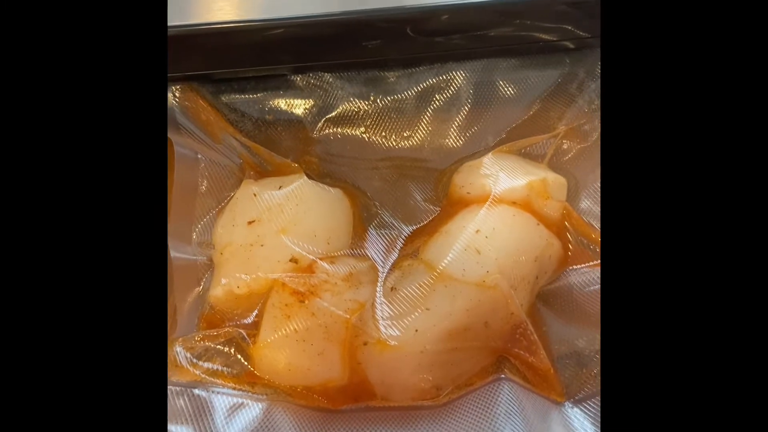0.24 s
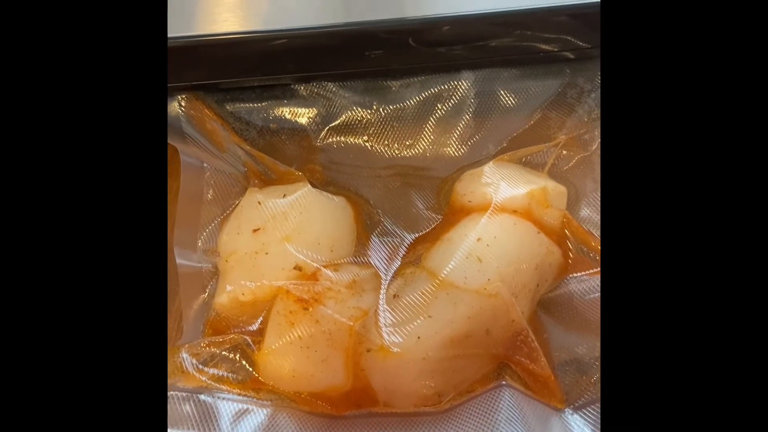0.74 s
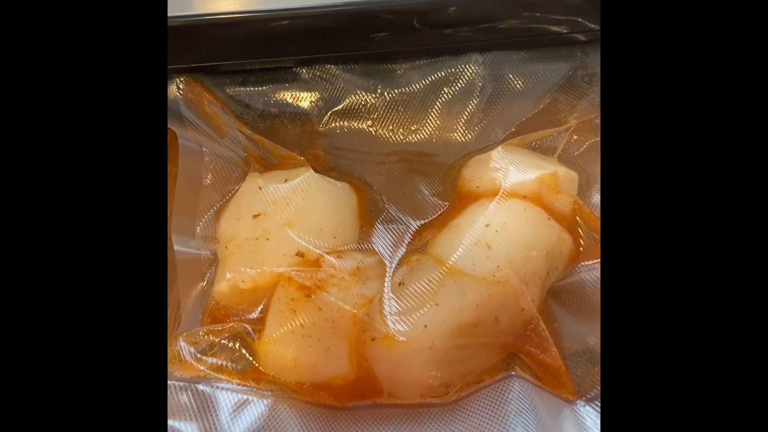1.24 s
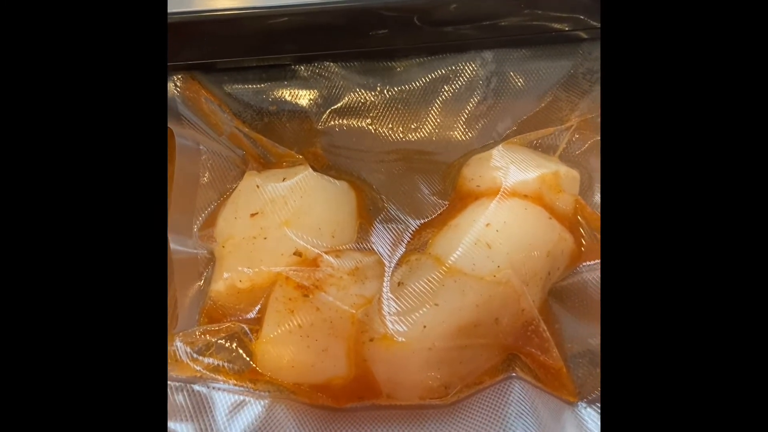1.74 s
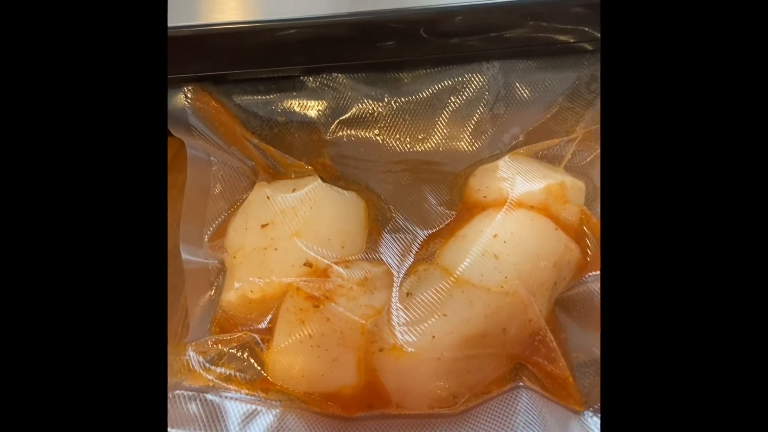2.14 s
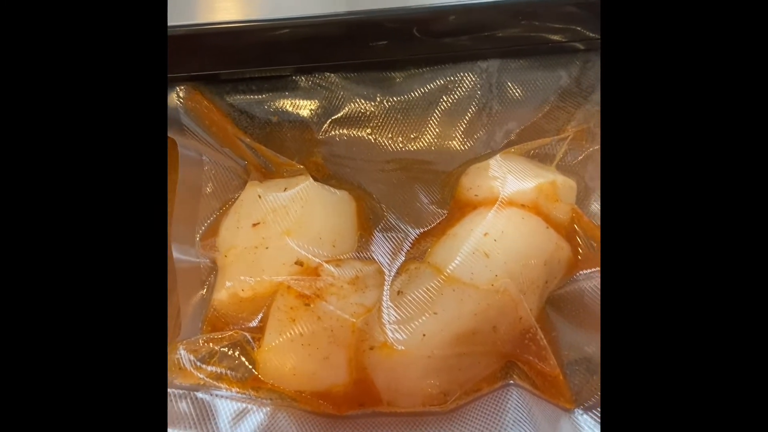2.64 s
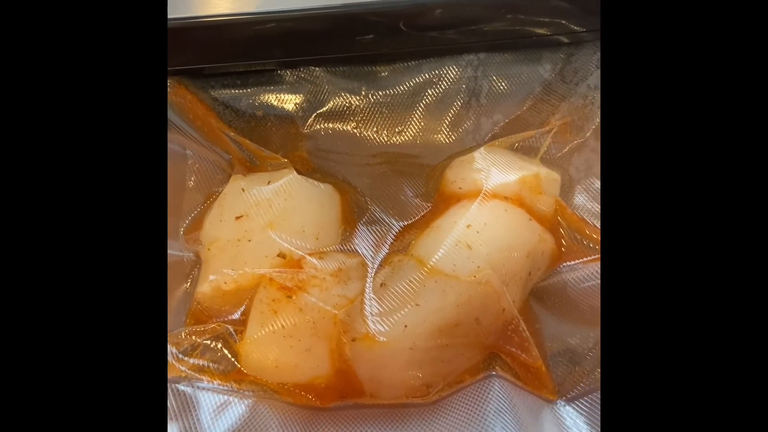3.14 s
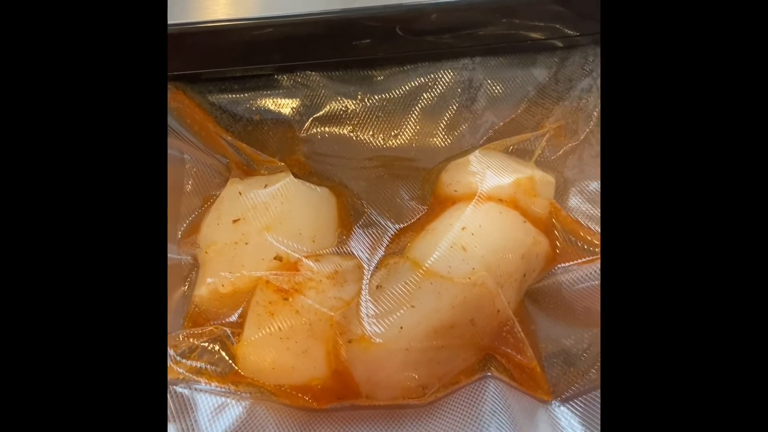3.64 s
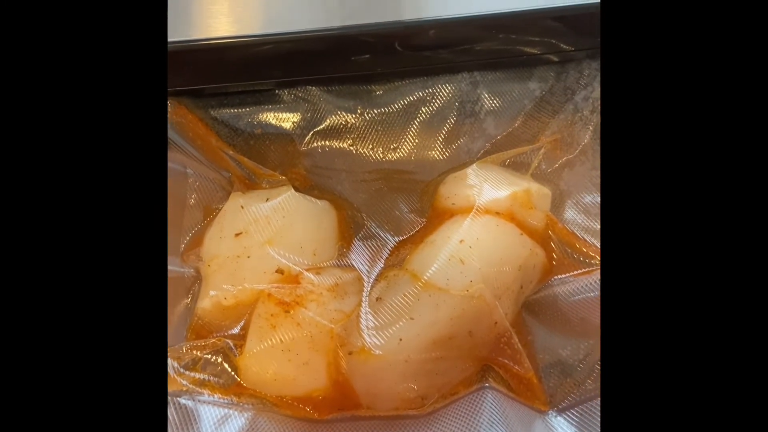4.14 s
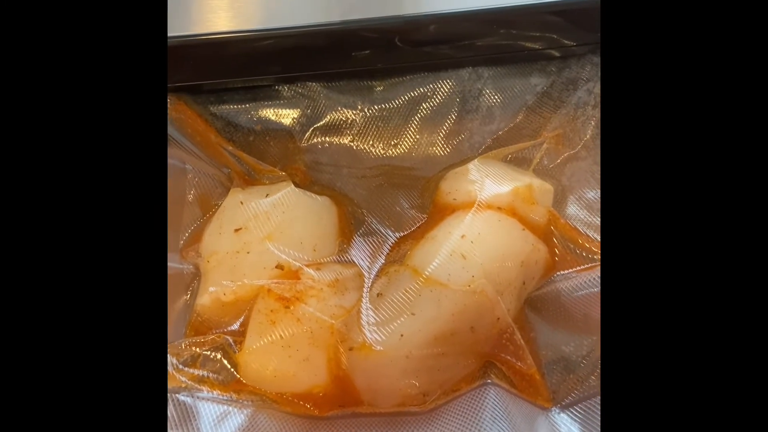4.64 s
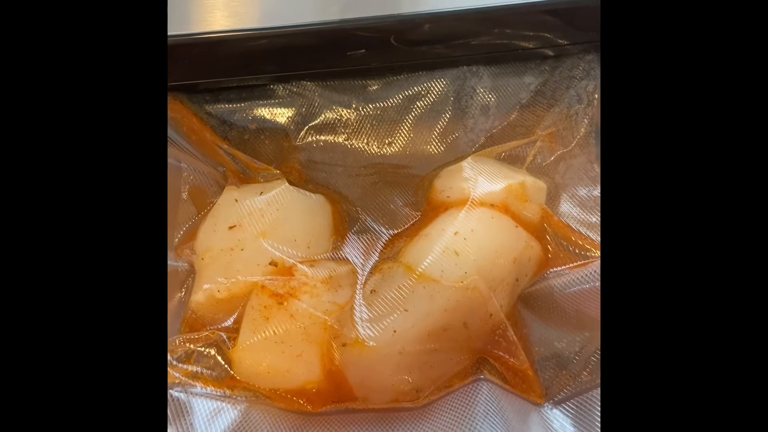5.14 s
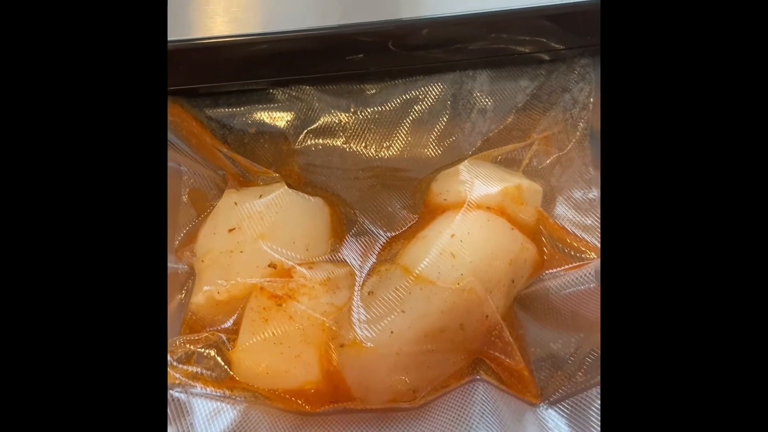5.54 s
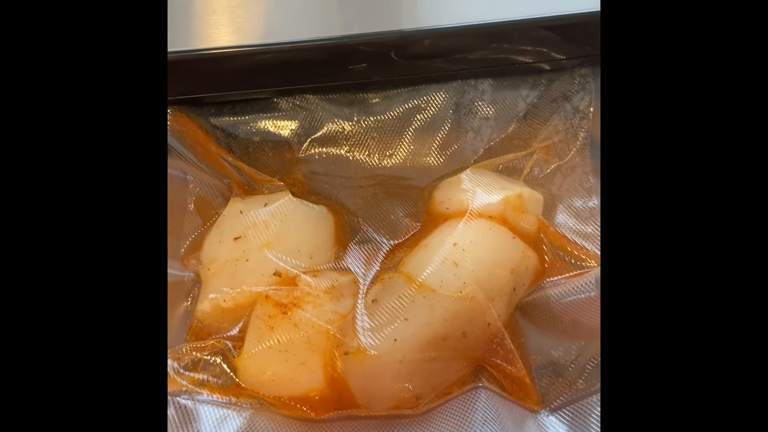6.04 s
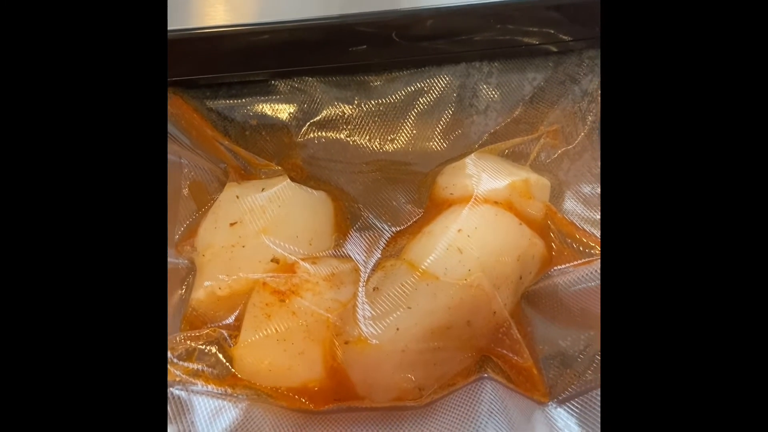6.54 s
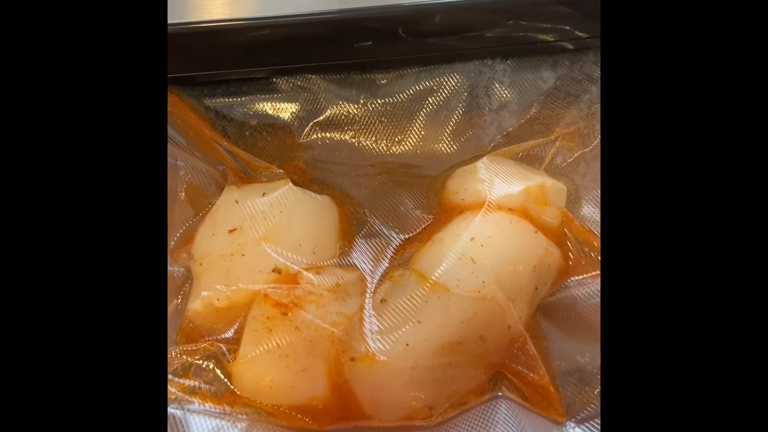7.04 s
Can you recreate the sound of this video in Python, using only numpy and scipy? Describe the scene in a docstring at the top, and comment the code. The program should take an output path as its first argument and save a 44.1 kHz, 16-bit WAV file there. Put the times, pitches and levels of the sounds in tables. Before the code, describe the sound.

Close, harsh motor drone of a kitchen vacuum sealer, fast clicking and puffing, growing more strained over two seconds, then holding without stopping.

```python
"""Geared vacuum pump on a kitchen counter

A piston pump draws air from a bag, heard close up. Every crank turn gives knocks, valve clicks and air puffs,
made as impulses through resonances and as gated noise, with an air note, a gear whine and a falling "wow".
Levels, timing and resonances shift from free (0) to loaded (1) as the vacuum builds.
A steady mains buzz lies below; a low hum throbs in the later half and the counter is bumped twice."""
import sys
import numpy as np
from scipy import signal
from scipy.fft import rfft, irfft, next_fast_len
from scipy.io import wavfile

SR = 44100
rng = np.random.default_rng(int(sys.argv[2]) if len(sys.argv) > 2 else 0)


def wav_out(sig):
    """Save sig, one row per channel (or a flat mono array), as 16-bit PCM at SR to the path in sys.argv[1]."""
    wavfile.write(sys.argv[1], SR, np.round(np.clip(np.atleast_2d(sig).T, -1, 1) * 32767).astype(np.int16))


N = 321930
TIME = np.arange(N) / SR


def amp(db):
    """Decibels to an amplitude factor."""
    return 10 ** (np.asarray(db) / 20)


def unit(x):
    """Scale to rms 1 over all channels together."""
    return x / np.sqrt(np.mean(x ** 2) + 1e-20)


def along(points, hz):
    """Interpolate (Hz, value) points on a log frequency axis."""
    point_hz, value = np.transpose(points)
    return np.interp(np.log(hz + 1), np.log(point_hz + 1), value)


def curves(rows):
    """One value per sample for each column after the time."""
    seconds, *columns = np.transpose(rows)
    return [np.interp(TIME, seconds, column) for column in columns]


def filtered(x, response):
    """Multiply the spectrum of x by a complex response of frequency."""
    size = next_fast_len(N + SR // 2)
    hz = np.fft.rfftfreq(size, 1 / SR)
    return irfft(rfft(x, size) * response(hz), size)[..., :N]


def noise(spectrum):
    """Gaussian noise coloured by a (Hz, relative dB per Hz) spectrum, rms 1."""
    return unit(filtered(rng.standard_normal(N), lambda hz: amp(along(spectrum, hz))))


# Build-up of vacuum. Each row: time in seconds, load from 0 (free) to 1.
VACUUM_BUILDUP = [(0, 0.084), (.6, 0.11), (1.2, .45), (1.8, 0.76), (2.3, 0.95), (3, 0.9), (7.3, 0.9)]


def vacuum():
    """How loaded the pump is, 0-1, at each sample."""
    return np.clip(curves(VACUUM_BUILDUP)[0], 0, 1)


def loaded(pair):
    """Value between its (free, loaded) ends at each sample."""
    free, full = pair
    return free + (full - free) * vacuum()


# Mean crank speed. Each row: time in seconds, speed in turns per second.
CRANK_SPEED = [(0, 27.344), (.5, 27.505), (.9, 27.826), (2.25, 28.047), (2.5, 28.168), (3.3, 28.419),
               (3.8, 28.495), (4.45, 28.5), (4.8, 28.217), (6, 28.269), (7.3, 28.239)]
# Rate of the early-late wander. Each row: time in seconds, rate in Hz.
HUNT_RATE = [(0, 3.4), (1.5, 4.55), (3.2, 5.25), (5.3, 5.73), (7.3, 6.3)]
START_TURN = -.302  # whole turns mark the valve click
HUNT_TURNS, HUNT_START_CYCLES = .0033, .26


def crank():
    """Crank turns at each sample: integrated mean speed plus a slight hunting of the motor."""
    hunt_cycles = HUNT_START_CYCLES + np.cumsum(curves(HUNT_RATE)[0]) / SR
    mean_turns = START_TURN + np.cumsum(curves(CRANK_SPEED)[0]) / SR
    return mean_turns + HUNT_TURNS * np.cos(2 * np.pi * hunt_cycles)


GEAR_SPREAD = .014  # relative stretch of the contact offsets


def blows(contacts, slip_s, scatter_db, gear_db, gear_turn=.3):
    """Impulse for each contact of each turn; strength and spacing also vary over seven turns of the gears."""
    turns = crank()
    count = np.arange(len(slip_s))[:, None]
    load = np.interp(count, turns, vacuum())
    free_turn, loaded_turn, free_db, loaded_db = np.transpose(contacts)
    gear = np.cos(2 * np.pi * (count - gear_turn) / 7)
    spread = 1 + GEAR_SPREAD * np.sin(2 * np.pi * (count - .3) / 7)
    offset = spread * (free_turn + load * (loaded_turn - free_turn))
    when_s = np.interp(count + offset, turns, TIME) + slip_s
    scatter = scatter_db * rng.standard_normal(when_s.shape)
    size = amp(free_db + load * (loaded_db - free_db) + gear_db * gear + scatter)
    samples = np.clip(when_s * SR, 0, N - 1).astype(int)
    return np.bincount(samples.ravel(), size.ravel(), N)


def puffs(train, decay_s, steady):
    """Envelope of rms 1: a swift swell and decay after each blow, over a steady part."""
    pulses = filtered(train, lambda hz: 1 / (1 + 2j * np.pi * hz * decay_s) ** 2)
    return unit(unit(pulses) + steady)


def mode_response(mode, state, hz):
    """Stereo resonance, free (state 0) or loaded (1), applied twice so that a ring swells before it dies."""
    centre_hz, width_hz, level_db = mode[state], mode[2], mode[3 + state]
    left_right_db, left_lead_rad = mode[5:]
    damping = 1j * hz * width_hz
    resonance = (damping / (centre_hz ** 2 - hz * hz + damping)) ** 2
    left = amp(left_right_db / 2) * np.exp(.5j * left_lead_rad)
    right = amp(-left_right_db / 2) * np.exp(-.5j * left_lead_rad)
    return amp(level_db) * resonance * np.array([[left], [right]])


def part(modes, train, rough, steady):
    """Blows and a little gated noise ring one part; its free and loaded ringing crossfade with the vacuum."""
    drive = unit(train) + rough * puffs(train, 0.00066, steady) * rng.standard_normal(N)
    out = 0
    for state, share in enumerate([1 - vacuum(), vacuum()]):
        def ring(hz):
            return sum(mode_response(mode, state, hz) for mode in modes)
        out = out + unit(filtered(drive, ring)) * share
    return out


# Decay of the room. Each row: frequency in Hz, T60 in seconds.
ROOM_T60 = [(100, 0.93), (1000, 1), (10000, 0.037)]


def kitchen(x):
    """Room tail: stereo noise in which each frequency dies at its own speed, convolved with x."""
    hz, t, z = signal.stft(rng.standard_normal((2, SR // 2)), SR, nperseg=256)
    decay = amp(-60 * t / along(ROOM_T60, hz)[:, None])
    tail = signal.istft(z * decay, SR, nperseg=256)[1]
    return signal.fftconvolve(x, tail / np.linalg.norm(tail[0]), axes=1)[:, :N]


def mains_buzz():
    """Mains buzz of the motor: a steady 120 Hz sine."""
    return amp(-50) * np.sin(2 * np.pi * 120 * TIME)


# Low hum. Each row: time in seconds, level in dB.
HUM_LEVEL = [(3.84, -52), (4.3, -43), (5.4, -47.5), (6.2, -51), (7.3, -59)]


def hum():
    """Two close low tones that throb against each other."""
    since = TIME - 3.9
    low = np.cos(2 * np.pi * 36.38 * since + .3)
    low = low + .7 * np.cos(2 * np.pi * 39.91 * since - .5)
    fade_in = np.clip((TIME - 3.84) / 0.048, 0, 1)
    return amp(curves(HUM_LEVEL)[0]) * fade_in * unit(low)


# Pushes on the counter. Each row: start in seconds, level before decay in dB, starting pitch in Hz.
COUNTER_BUMPS = [(1.102, -30, 79.2), (2.6877, -22.5, 113)]
BUMP_T60_S, BUMP_ATTACK_S, BUMP_SAG_PER_S = 0.12, 0.00089, 17


def bumps():
    """Dull bumps of the counter: short decaying sines that fall in pitch."""
    out = np.zeros(N)
    for start_s, level_db, start_hz in COUNTER_BUMPS:
        t = np.clip(TIME - start_s, 0, None)
        envelope = amp(level_db - 60 * t / BUMP_T60_S) * (1 - np.exp(-t / BUMP_ATTACK_S))
        out += envelope * np.sin(2 * np.pi * start_hz * t / (1 + BUMP_SAG_PER_S * t))
    return out


def stereo(mid, side):
    """Mid and side to left and right."""
    return np.array([mid + side, mid - side])


# Spectrum of the case rattle. Each row: frequency in Hz, relative level in dB per Hz.
RATTLE_SPECTRUM = [(15, -57), (25, -12), (45, -8), (60, -2.5), (100, 4), (135, -1), (236, 1), (397, 7.5),
                   (485, -1), (642, -4.5), (1080, 8), (1710, -4), (2310, -18), (3000, -38), (6600, -120)]


def rattle():
    """Loose rattle of the case: steady low noise, mostly in the middle."""
    return stereo(amp(-37.5) * noise(RATTLE_SPECTRUM), amp(-48) * noise(RATTLE_SPECTRUM))


# Spectra of the hiss, middle and side. Each row: frequency in Hz, relative level in dB per Hz.
HISS_MID = [(1530, -1), (2600, 4.5), (2910, -1), (3260, 1), (3900, -5.5), (4900, -4.5), (5350, -2.5),
            (5800, -6), (6430, -6.5), (7210, -37), (9040, -9.5), (10200, -16.5), (11700, -15), (13700, -42),
            (15100, -23), (15800, -24)]
HISS_SIDE = [(1530, -61), (2600, 4), (4000, -11), (4380, -3.5), (4980, -16), (6200, -4), (6730, -5.5),
             (9110, -13), (10400, -32), (11700, -21), (13500, -12), (15800, -27)]
# Puffs of one turn. Each row: free and loaded place in turns after the click, free and loaded relative dB.
PUFFS = [(0.039, -0.057, 0.5, 7.4), (0.4, 0.462, 3.8, 8.9), (0.56, 0.64, 3.2, 3), (-0.31, -0.304, 2.5, 1.4)]


def air(slip_s):
    """Hiss through the valves: coloured noise that puffs with the stroke."""
    gate = puffs(blows(PUFFS, slip_s, scatter_db=1.5, gear_db=-0.6), decay_s=0.0016, steady=1.6)
    return stereo(amp(-39.0) * gate * noise(HISS_MID), amp(-43.0) * gate * noise(HISS_SIDE))


MESH_TEETH_PER_TURN, MESH_FASTEST_TURN = 170 / 7, -.04
MESH_SWING = 4.76  # pitch swing, multiples of the crank rate
MESH_BASE_DB = (-47.5, -46.5)  # (free, loaded), before the left and right gains


def gears():
    """Gear teeth whine at a pitch that swings up and down once a turn."""
    shaft = 2 * np.pi * crank()
    angle = MESH_TEETH_PER_TURN * shaft + MESH_SWING * np.sin(shaft - 2 * np.pi * MESH_FASTEST_TURN)
    left_right_gain_db = np.array([[1.8], [4]])
    level = amp(loaded(MESH_BASE_DB) + left_right_gain_db)
    return level * np.cos(angle + np.array([[-.35], [.35]]))


# Air note round the stroke. Each row: place in turns after the click, free and loaded pitch in Hz,
# free and loaded relative level in dB.
AIR_NOTE = [(.04, 2205, 2297, -66, -49), (.1, 2056, 2134, -58, -49.5), (.25, 1740, 1694, -34.5, -47),
            (.4, 1360, 1302, -34, -38), (.47, 1160, 1503, -41, -33), (.54, 970, 1950, -32, -44),
            (.57, 950, 1940, -65, -43), (.58, 1860, 1950, -59, -31), (.63, 1870, 2010, -60, -35.5),
            (.8, 2210, 2320, -55, -39.5), (0.879, 2310, 2450, -65, -62)]
CYLINDER_WIDTH_HZ = 52
CYLINDER_CLEAR = 4  # steady part of the note over its breath


def cylinder():
    """Air in the cylinder sings a breathy note whose pitch falls on the draw and rises on the return."""
    turns = crank()
    place, *columns = np.transpose(AIR_NOTE)
    free_hz, loaded_hz, free_db, loaded_db = [np.interp(turns % 1, place, c) for c in columns]
    breath = filtered(rng.standard_normal((2, N)), lambda hz: 1 / (1 + (hz / CYLINDER_WIDTH_HZ) ** 2))
    breath = breath / np.std(breath)
    angle = 2 * np.pi * np.cumsum(loaded([free_hz, loaded_hz])) / SR
    angle = angle - angle[np.searchsorted(turns, np.floor(turns))]  # phase restarts each turn
    note = unit((breath[0] + CYLINDER_CLEAR) * np.cos(angle) + breath[1] * np.sin(angle))
    return amp(loaded([free_db, loaded_db]) + np.array([[-1.5], [1.5]])) * note


# Rasp resonances. Each row: free and loaded pitch in Hz, width in Hz, free and loaded relative dB,
# left-right in dB, left lead in rad.
RASP_MODES = [(3200, 3200, 470, 0, 1, -2.8, 0), (3850, 3780, 270, 0, -3.2, -4.2, 0)]
# Rasp contacts. Each row: free and loaded place in turns after the click, free and loaded relative dB.
RASP_CONTACTS = [(.45, .46, -5, -2.5), (.53, 0.58, -2, 8), (-.33, -0.2, -4, -1), (-.22, -.2, 5, -15)]


def rasp(slip_s):
    """Rasp: rough blows ring two high resonances."""
    train = blows(RASP_CONTACTS, slip_s, scatter_db=1, gear_db=.5)
    return amp(loaded((-50, -55))) * part(RASP_MODES, train, rough=.3, steady=.1)


# Whine resonance. Each row: free and loaded pitch in Hz, width in Hz, free and loaded relative dB,
# left-right in dB, left lead in rad.
WHINE_MODES = [(1890, 1934, 175, 0, 0, -0.33, 0)]
# Whine contacts. Each row: free and loaded place in turns after the click, free and loaded relative dB.
WHINE_CONTACTS = [(.58, .585, 0, -3), (.11, .115, -3, -5), (-.06, -.06, -3, -9), (-.24, -.24, -6, -10),
                  (.5, .5, -8, -8)]


def whine(slip_s):
    """Whine: quick blows ring a single resonance."""
    train = blows(WHINE_CONTACTS, slip_s, scatter_db=.9, gear_db=.4)
    return amp(-40.0 - 2.3 * vacuum()) * part(WHINE_MODES, train, rough=.1, steady=.6)


# Base resonance. Each row: free and loaded pitch in Hz, width in Hz, free and loaded relative dB,
# left-right in dB, left lead in rad.
BASE_MODES = [(959, 918, 80, 0, 0, -4.5, -1.5)]
# Base contacts. Each row: free and loaded place in turns after the click, free and loaded relative dB.
BASE_CONTACTS = [(-.27, -.19, 0, -8), (.24, .25, -4, -8), (.58, .57, -3, -10)]


def base(slip_s):
    """Base: knocks ring its one resonance."""
    train = blows(BASE_CONTACTS, slip_s, scatter_db=.5, gear_db=1.8, gear_turn=1.1)
    return amp(loaded((-38.5, -34))) * part(BASE_MODES, train, rough=.1, steady=.6)


# Case resonances. Each row: free and loaded pitch in Hz, width in Hz, free and loaded relative dB,
# left-right in dB, left lead in rad.
CASE_MODES = [(1091, 1101, 177, 7.5, 3.5, -14.5, -0.083), (1225, 1240, 55, -13, -0.5, 12, -0.58),
              (1402, 1600, 86, 5.5, -3.5, 0, 0.53)]
# Case contacts. Each row: free and loaded place in turns after the click, free and loaded relative dB.
CASE_CONTACTS = [(-.27, -.2, -3, -5), (.38, .3, -6, -9), (.58, .56, -5, -10)]


def case(slip_s):
    """Plastic case: knocks ring its resonances."""
    train = blows(CASE_CONTACTS, slip_s, scatter_db=.5, gear_db=1.8, gear_turn=-.6)
    return amp(loaded((-38, -34.5))) * part(CASE_MODES, train, rough=.1, steady=.6)


# Lid resonances. Each row: free and loaded pitch in Hz, width in Hz, free and loaded relative dB,
# left-right in dB, left lead in rad.
LID_MODES = [(590, 604, 119, -3.5, 1.7, -0.42, -1.22), (739, 723, 172, 0.5, 2.2, 1, -0.8)]
# Lid contacts. Each row: free and loaded place in turns after the click, free and loaded relative dB.
LID_CONTACTS = [(.12, -.008, 8.5, -.5), (.332, .351, 1.5, .5), (.49, .57, 5, 2.8), (-.22, -.201, 4, -7.7)]


def lid(slip_s):
    """Lid: knocks ring its low resonances."""
    train = blows(LID_CONTACTS, slip_s, scatter_db=1.1, gear_db=.6)
    return amp(-38.5 - 1.8 * vacuum()) * part(LID_MODES, train, rough=.2, steady=.8)


# Valve resonances. Each row: free and loaded pitch in Hz, width in Hz, free and loaded relative dB,
# left-right in dB, left lead in rad.
VALVE_MODES = [(2330, 2328, 218, 17, 18, -5, 0), (5370, 3700, 130, -38, -8.5, -40, 0.025),
               (9450, 8790, 580, -37, -8.5, -1, 0.18), (5300, 4800, 180, -32, -17, -2, 0)]
# Valve contacts. Each row: free and loaded place in turns after the click, free and loaded relative dB.
VALVE_CONTACTS = [(-.03, -0.052, 8, 1), (0.26, 0.27, -4, -5), (0.471, 0.51, -6, -26),
                  (-.23, -0.21, -9, -11), (.07, .07, -10, -18)]
# Slow level changes. Each row: time in seconds, extra level of the upper throb in dB, valve level in dB.
THROB_AND_VALVE_LEVEL = [(0, -1.5, -41), (1.1, -1.5, -36.5), (1.9, 0, -37), (2.15, -5, -42),
                         (2.8, -5, -39.5), (3.7, 0, -38.5), (7.3, 0.5, -37)]


def valve(slip_s):
    """Valve: sharp clicks ring its high resonances."""
    train = blows(VALVE_CONTACTS, slip_s, scatter_db=.6, gear_db=.9)
    return amp(curves(THROB_AND_VALVE_LEVEL)[1]) * part(VALVE_MODES, train, rough=.1, steady=.6)


# Times of the five stages of the building vacuum, in seconds.
STAGES_S = [.1, .5, 1, 1.6, 2.6]
# Throb harmonics. Each row: multiple of the crank rate, then relative level in dB at each of the five stages.
THROB_HARMONICS = [(2, -11, -23, -22, -23, -21), (3, -6.5, -8.5, -5.5, -6, -9),
                   (4, -14, -8, -4, -4.5, -5.5), (5, -9, -15, -8, -7, -4.5), (6, -1.5, -2.5, -9, -15, -9.5),
                   (7, -5, -3, -4, -18, -17.5), (8, -12, -4, -3.5, -5.5, -20.5), (9, -1, -7, -7, -5, -13.5),
                   (10, 3.5, -5, -9, -0.5, -10.5), (11, -2, -17, -14, -14, -8),
                   (12, -0.5, 5.5, -4, -10, -5), (13, 5, 2.5, 3.5, 2.5, -4), (14, 3, -5, 2.5, -2, 2),
                   (15, -3, 4, -8, 1, -1.5), (16, -9, 2, -14, 0.5, -12.5), (17, -9, -13, -24, -13, -21)]
# each (free, loaded): turns after the click, push over pull
PUSH_TURN, PULL_TURN, PUSH_SHARE = (-.065, .02), (.155, .145), (1.2, .5)
REBOUND_TURNS = .43  # advance of the group of harmonics 8-11 under full load


def chest():
    """Piston push and pull once a turn: crank harmonics phased by those two moments."""
    step = 64  # slow curves are computed on a coarse grid
    coarse_s = TIME[::step]
    turns, load = crank(), vacuum()
    upper_db = curves(THROB_AND_VALVE_LEVEL)[0][::step]
    push, pull, share = (loaded(pair)[::step] for pair in (PUSH_TURN, PULL_TURN, PUSH_SHARE))
    out = 0
    for k, *stages_db in THROB_HARMONICS:
        hollow = np.clip((k - 7) / 4, 0, 1)  # upper harmonics live in the hollow of the housing
        level_db = np.interp(coarse_s, STAGES_S, stages_db) + hollow * upper_db - 39
        lean = amp(np.array([[1.2], [-1.2]]) * hollow)
        both = share * np.exp(-2j * np.pi * k * push) - np.exp(-2j * np.pi * k * pull)
        phase = np.interp(TIME, coarse_s, np.unwrap(np.angle(both)))
        if k > 7:
            phase = phase - 2 * np.pi * REBOUND_TURNS * load * max(12 - k, 0)
        level = np.interp(TIME, coarse_s, amp(level_db))
        out = out + lean * (level * np.cos(2 * np.pi * k * turns + phase))
    return out


# pairs are (free, loaded) unless noted
WOW_START_TURN, WOW_END_TURN = (.05, -.045), (.17, .2)  # after the click
WOW_START_HZ, WOW_END_HZ, WOW_MEAN_DB = (1074, 1137), (960, 962), (-17.5, -14)
WOW_ATTACK_TURNS, WOW_RELEASE_TURNS = .03, .018
WOW_LEFT_DB, WOW_LEFT_LEAD_RAD = (-16, -6.5), (-0.26, -1.16)  # left against right at (start, end)
WOW_GEAR_DB, WOW_SCATTER_DB, WOW_SCATTER_RAD = 1.3, .5, .2
WOW_DROP, WOW_DROP_SWING, WOW_STEEP = .52, .13, 2.8  # drop: where in the burst the pitch falls, 0-1
WOW_LATEST_TURN = 5.8  # of seven, drop falls latest
WOW_DIP_HZ, WOW_DIP_WIDTH_HZ, WOW_DIP = 1032, 70, .45


def wow():
    """Main stroke drives the case in a burst that slides down in pitch, varying over seven turns."""
    turns = crank()
    count = np.floor(turns + .3).astype(int)
    since = turns - count - loaded(WOW_START_TURN)
    length = loaded(WOW_END_TURN) - loaded(WOW_START_TURN)
    way = np.clip(since / length, 0, 1)
    drop = WOW_DROP + WOW_DROP_SWING * np.cos(2 * np.pi * (count - WOW_LATEST_TURN) / 7)
    glide = .5 + .5 * np.tanh(WOW_STEEP * (way - drop))
    pitch_hz = loaded(WOW_START_HZ) * (1 - glide) + loaded(WOW_END_HZ) * glide
    angle = 2 * np.pi * np.cumsum(pitch_hz) / SR
    chance = rng.standard_normal((count.max() + 2, 2))[count]
    # phase is aligned here in every burst, apart from the scatter
    middle = np.clip(np.searchsorted(turns, count + .08), 0, N - 1)
    angle = angle - angle[middle] + WOW_SCATTER_RAD * chance[:, 0]
    release = np.exp(-np.clip(since - length, 0, None) / WOW_RELEASE_TURNS)
    shape = np.clip(since / WOW_ATTACK_TURNS, 0, 1) * release
    gear_db = WOW_GEAR_DB * np.cos(2 * np.pi * count / 7)
    level_db = loaded(WOW_MEAN_DB) + gear_db + WOW_SCATTER_DB * chance[:, 1]
    left_db, left_lead = (a + (b - a) * way for a, b in (WOW_LEFT_DB, WOW_LEFT_LEAD_RAD))
    left, right = amp(left_db) * np.cos(angle + left_lead), np.cos(angle)
    burst = amp(level_db) * shape * np.array([left, right])

    def case_dip(hz):
        """The case radiates less between its two rings."""
        damping = 1j * hz * WOW_DIP_WIDTH_HZ
        return 1 - WOW_DIP * damping / (WOW_DIP_HZ ** 2 - hz * hz + damping)
    return filtered(burst, case_dip)


def pump(slip_s):
    """Ringing parts, gear whine, air note and main stroke of the machine."""
    parts = rasp(slip_s) + whine(slip_s) + base(slip_s) + case(slip_s) + lid(slip_s) + valve(slip_s)
    return gears() + cylinder() + parts + wow()


def scene():
    """Machine, its room and the low sounds around it."""
    # each turn's blows fall a little early or late
    slip_s = .00004 * rng.standard_normal((int(crank()[-1]) + 1, 1))
    machine = pump(slip_s)
    room = amp(-16) * kitchen(machine)
    low = mains_buzz() + hum() + bumps()
    return room + low + rattle() + air(slip_s) + chest() + machine


def record(dry):
    """Band limit: nothing passes from 15830 Hz up."""
    return filtered(dry, lambda hz: hz < 15830)


dry = scene()
out = record(dry)
wav_out(out)
```